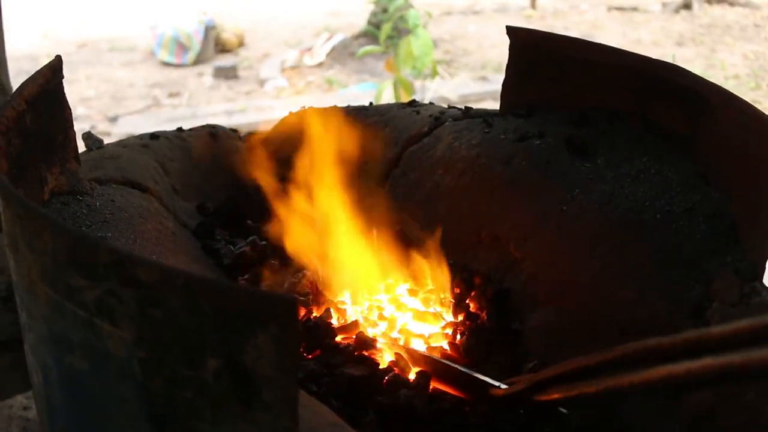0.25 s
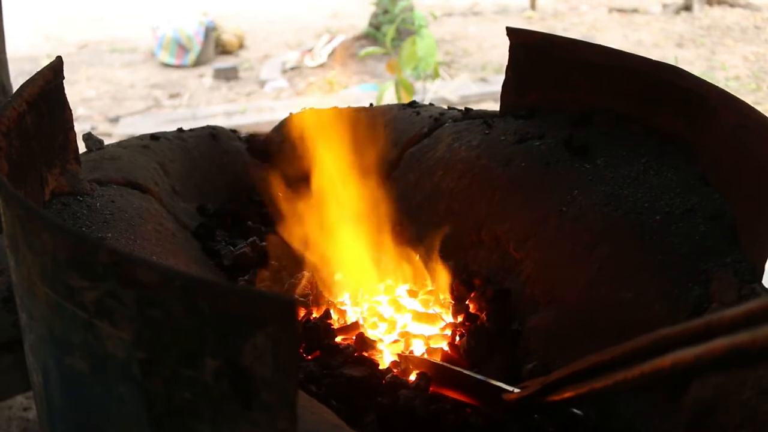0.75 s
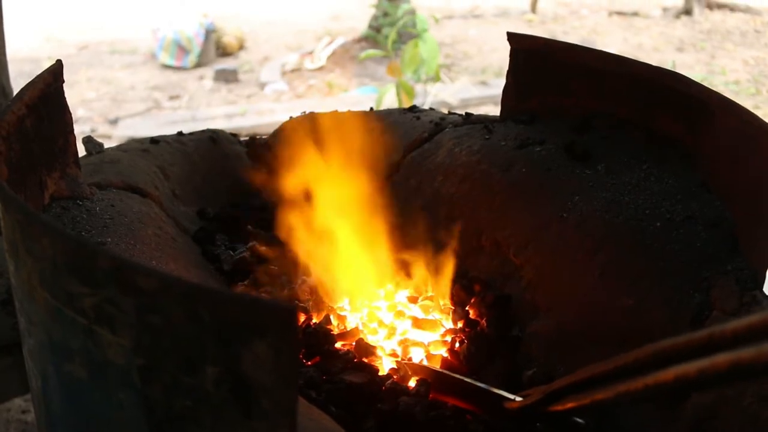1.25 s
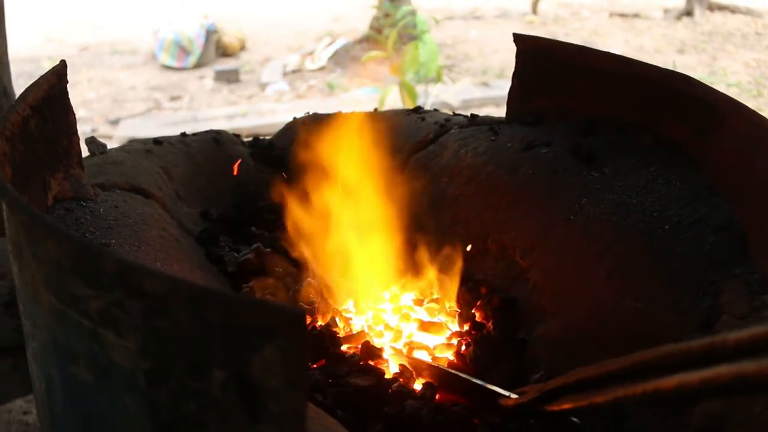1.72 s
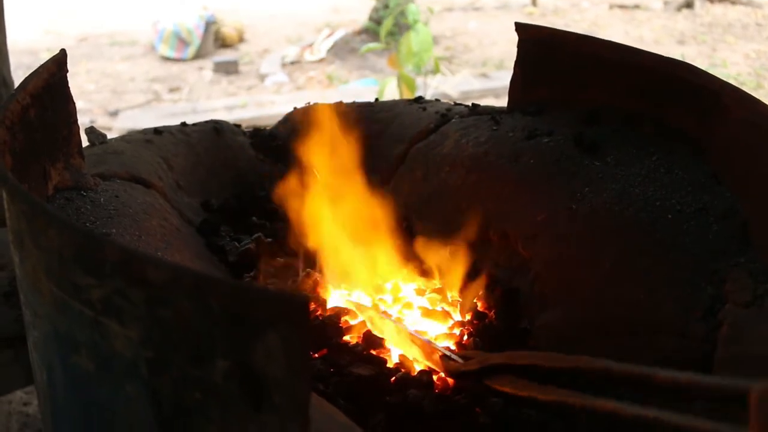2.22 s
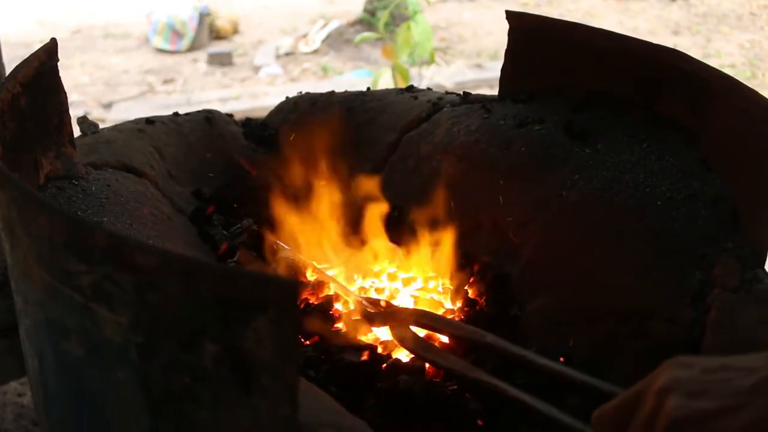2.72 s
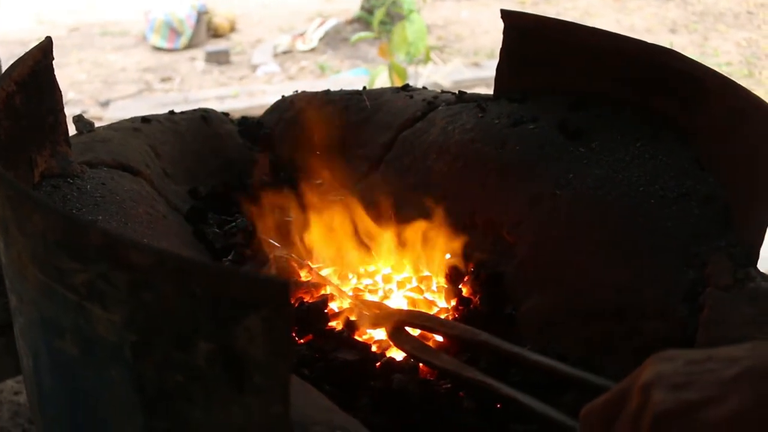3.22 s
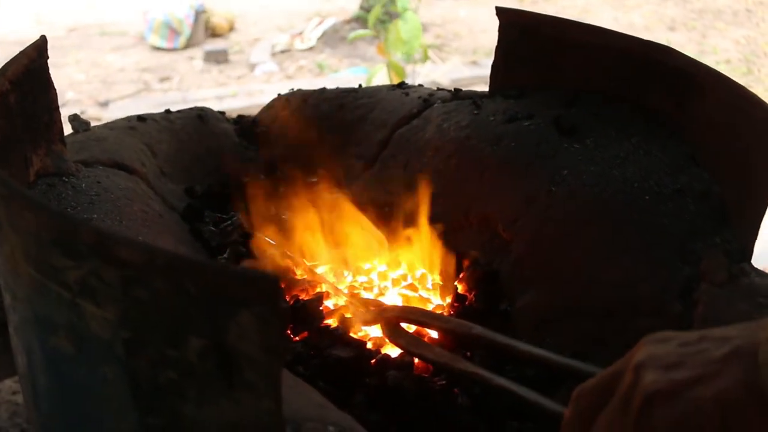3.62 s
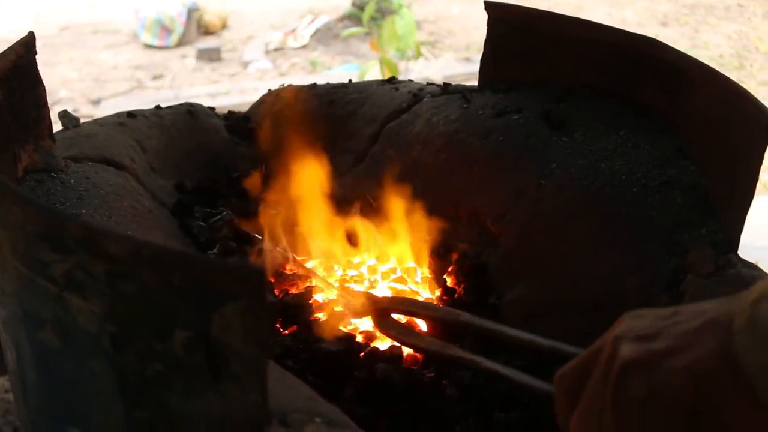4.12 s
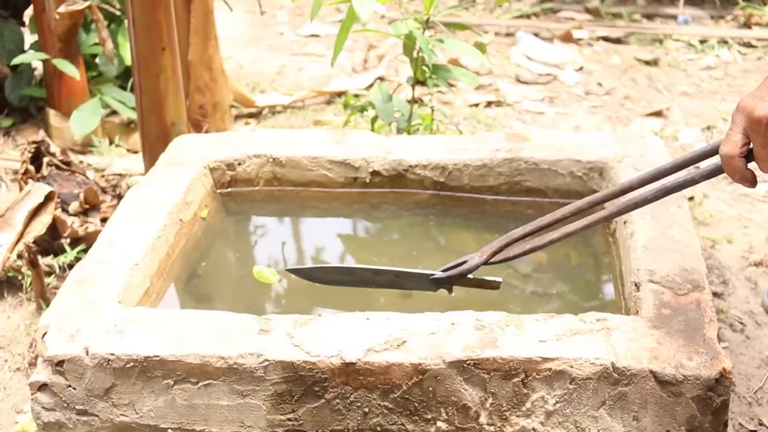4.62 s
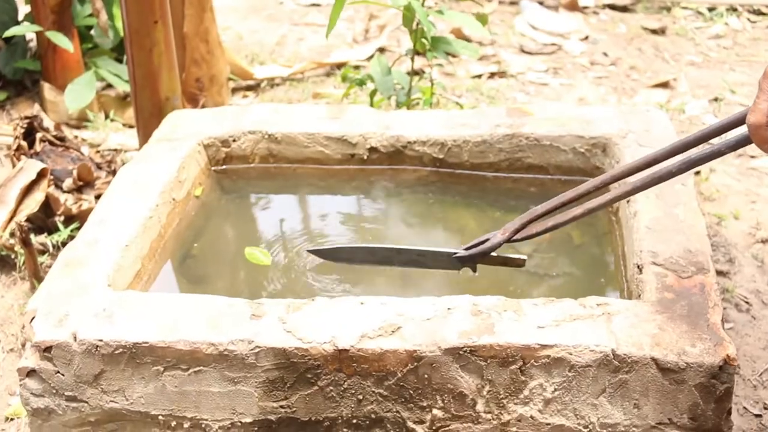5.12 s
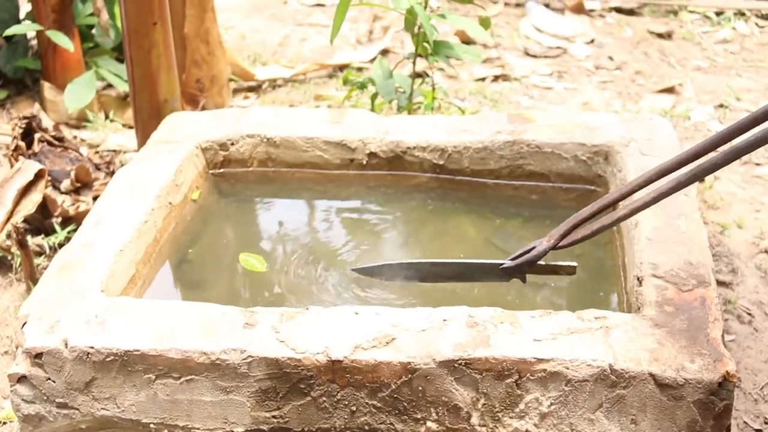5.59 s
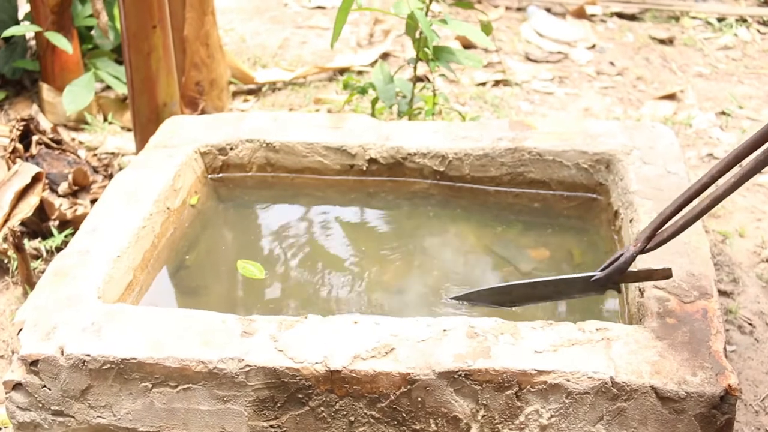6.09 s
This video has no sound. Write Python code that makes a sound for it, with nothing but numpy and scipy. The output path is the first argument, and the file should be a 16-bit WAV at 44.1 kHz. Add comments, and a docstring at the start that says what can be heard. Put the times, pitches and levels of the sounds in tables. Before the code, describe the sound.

A forge fire roars close by in a smithy yard, with the whine and fast metallic rattle of its blower and a few thin snaps of charcoal. After about four seconds the sound switches suddenly to a nearby water tank, where hot steel spits, then sizzles and bubbles for nearly two seconds until it is lifted. Behind it are quiet open air, the fading fan and a faint, distant engine.

```python
"""A smithy yard, close to a charcoal forge: an electric blower drives air roaring through the coals,
its fan whining and its loose bearing rattling in a quick, even beat. The roar ends at once and we are
at a stone water tank, the fan coasting down farther off. A hot blade is dipped: the water spits, then
steam bubbles collapse in a long boiling hiss until it is lifted. A small engine chugs in the distance."""
import sys
import numpy as np
from scipy import signal
from scipy.fft import rfft, irfft, next_fast_len
from scipy.io import wavfile
from scipy.ndimage import uniform_filter1d, map_coordinates

SR = 44100
rng = np.random.default_rng(int(sys.argv[2]) if len(sys.argv) > 2 else 0)


def wav_out(sig):
    """Save sig, one row per channel (or a flat mono array), as 16-bit PCM at SR to the path in sys.argv[1]."""
    wavfile.write(sys.argv[1], SR, np.round(np.clip(np.atleast_2d(sig).T, -1, 1) * 32767).astype(np.int16))


N = 280031

# Spectra of the sources. Each row: frequency in Hz, relative level in dB.
OPEN_AIR = [(20, 4), (60, -4), (95, 1), (130, 9.5), (250, 3.5), (500, 5.5), (900, -1), (1500, -2),
            (4000, -19.5), (15000, -23)]
COAL_ROAR = [(60, -33.5), (130, -11.5), (200, -9), (290, -1), (480, 0.5), (820, -2), (1020, 0),
             (1250, -3.5), (1580, -4.5), (1800, -11.5), (2350, -14.5), (3800, -22.5), (7000, -31.5),
             (15000, -41.5)]
FLAME_RUMBLE = [(10, 3), (25, -5.5), (70, -2), (130, 0.5), (250, -14), (600, -34)]
EMBER_CRACKLE = [(3000, -8), (9000, 1), (12500, -7), (14000, 0), (15700, -6)]
HOUSING_RATTLE = [(900, -26), (2000, -9), (3000, 4.5), (3900, -6), (4500, 4), (5300, 5.5), (6150, 2),
                  (6500, -6), (7200, -16), (8000, -8), (9500, -3), (11200, -4.5), (13000, -15),
                  (15700, -24)]
WATER_BOIL = [(300, -26), (700, -17.5), (1080, -17.5), (1400, -7), (2300, -9.5), (3000, -4), (4700, -5),
              (6000, -4), (8800, -2), (10500, -10.5), (11500, -10.5), (13200, -3), (14500, -5.5),
              (15700, -5)]
STEAM_SPIT = [(1200, -22), (2100, -3), (2600, 12), (3400, 8), (4500, -3), (6000, 6), (9000, 10), (14000, 6),
              (15700, 9)]
BREEZE = [(10, -7), (30, 0), (55, -8), (150, -35), (500, -70)]
FAR_ENGINE = [(60, -22), (115, 1.5), (400, 9), (800, -37), (2000, -30)]
FAR_RUSH = [(100, -8), (300, -1.5), (900, 0), (1500, -7.5), (4000, -14.5), (15000, -25)]
COAL_SNAP = [(2000, -17), (5000, 8), (7000, -3), (10000, 3), (13500, 3), (15700, -3)]
# Resonances and dips. Each row: centre in Hz, width in Hz, gain in dB.
HEARTH_MODES = [(466, 23, 2.5), (677, 50, 2.5), (1850, 70, 1), (2100, 120, 5), (2350, 100, 4),
                (2870, 160, 3), (3370, 150, 2)]  # air pipe and hearth
HOUSING_MODES = [(4470, 38, 7), (4780, 80, -8), (4950, 49, 7), (5530, 51, 2.5), (6060, 47, 2.5),
                 (7000, 140, -9), (7640, 60, 12), (7960, 90, 3), (8360, 49, 9), (8640, 60, -7),
                 (8800, 60, 7), (9370, 50, 7), (10200, 60, 5), (10700, 120, 0.5), (12520, 43, 1),
                 (14400, 150, 7)]  # the blower's thin metal
TANK_MODES = [(1380, 160, -0.5), (1676, 120, -6.5), (2140, 59, 0), (2310, 110, -2.5), (2730, 220, 2),
              (3280, 120, -7), (5440, 140, 5), (5880, 120, 2.5), (6850, 130, 0.5)]  # between the stone walls
# The engine's exhaust pipe. Each row: frequency in Hz, relative level in dB, t60 in seconds.
EXHAUST_MODES = [(140, -8.5, 0.08), (195, -4, 0.062), (336, -2.5, 0.021)]
# The six-bladed fan from close by. Each row: multiple of the shaft speed, rms level in dB.
FAN_TONES = [(3, -46.5), (6, -35), (10, -47.5), (11, -45.5), (12, -33.5), (13, -42.5), (18, -43),
             (21, -52.5), (25, -52)]
# Charcoal splitting. Each row: start in seconds, starting level in dB.
SNAP_EVENTS = [(0.0702, -41), (0.1012, -31), (0.1645, -33), (0.4075, -39), (0.9986, -37), (1.2446, -37),
               (1.6591, -40), (3.0864, -32), (3.4481, -38)]
# Water flashing to steam. Each row: start in seconds, level in dB, t60 in seconds.
SPIT_EVENTS = [(4.596, -24.5, 0.14), (5.191, -22, .015), (5.562, -23, 0.034)]
# Resonances and one dip around the blade. Each row: centre in Hz, strongest moment in seconds,
# swell width in seconds, gain in dB.
BLADE_RESONANCES = [(3580, 5.2, 0.48, 5.5), (6220, 5, .28, 7), (6190, 5.59, 0.34, 9.5),
                    (7010, 5.77, 0.27, 7), (9860, 5.26, .55, -5)]
# Bubbles, from big and gurgling to fine and hissing. Each row: low and high edge in Hz, time of full
# strength in seconds, level in dB, surge in dB, drift in dB per second.
BUBBLE_BANDS = [(200, 2500, 4.81, -44, 2.5, 2.5), (2520, 4500, 4.795, -36.5, 3.5, 0.4),
                (4410, 10060, 4.765, -28, 2.5, -1), (9970, 17600, 4.748, -25, 1, -1.3)]

SHAFT_HZ, BEAT_HZ, BALL_HZ = 74.29, 11.89, 246.66  # the blower: its turn, bearing play, passing balls
STIR_S = 2.33  # tongs push into the coals
FORGE_END_S, TOUCH_S = 4.407, 4.5  # the roar ends; the blade grazes the water


def amp(db):
    """Decibels to gain."""
    return np.exp(np.maximum(db, -300) * np.log(10) / 20)


def unit(x):
    """Scale to rms 1."""
    return x / np.sqrt(np.mean(x ** 2) + 1e-20)


def clock():
    """The time of every sample in seconds."""
    return np.arange(N) / SR


def since(s):
    """Seconds gone by since s, 0 before it."""
    return np.maximum(clock() - s, 0)


def ramp(start_s, length_s):
    """0 before the start, then straight up to 1."""
    return np.clip((clock() - start_s) / length_s, 0, 1)


def swell(centre, width, x):
    """A bell over x, 1 at its centre."""
    return np.exp(-((x - centre) / width) ** 2)


def wobble(rate):
    """A smooth random curve, rate knots a second."""
    return map_coordinates(rng.standard_normal(int(N * rate / SR) + 4), [clock() * rate])


def filtered(x, response):
    """x times a response of frequency."""
    size = next_fast_len(N + 8192)
    return irfft(rfft(x, size) * response(np.fft.rfftfreq(size, 1 / SR)), size)[..., :N]


def edge(hz, edge_hz):
    """Gain of a steep high-pass."""
    return 1 - 1 / (1 + (hz / edge_hz) ** 16)


def coloured(x, spectrum, modes=()):
    """x shaped by a spectrum on a log axis with bell-shaped resonances on it, at rms 1."""
    points_hz, points_db = np.transpose(spectrum)

    def response(hz):
        outline_db = np.interp(np.log(hz + 1), np.log(points_hz + 1), points_db)
        return amp(outline_db + sum(db * swell(centre, width, hz) for centre, width, db in modes))
    return unit(filtered(x, response))


def noise(spectrum, modes=()):
    """Coloured noise of rms 1."""
    return coloured(rng.standard_normal(N), spectrum, modes)


def crackle(rate, spread_db, snap_s, ring_s, ring_share):
    """Random tiny bursts of scattered size: each is a snap of noise and a weaker, longer ring."""
    sizes = amp(spread_db * np.clip(rng.standard_normal(N), -2.6, 2.6))
    energy = sizes ** 2 * (rng.random(N) < rate / SR)
    t = np.arange(SR // 20) / SR
    fade = np.exp(-t / snap_s) / snap_s + ring_share * np.exp(-t / ring_s) / ring_s
    envelope = np.sqrt(np.abs(signal.fftconvolve(energy, fade)[:N]))
    return unit(envelope * rng.standard_normal(N))


def yard(air_db=-46.5, puff_s=5.1, puff_width_s=0.04, puff_db=-48):
    """Quiet open air all round, and one soft puff of breeze on the microphone."""
    puff = swell(puff_s, puff_width_s, clock()) * noise(BREEZE)
    return amp(air_db) * noise(OPEN_AIR) + amp(puff_db) * puff


def engine(level_db=-48, firing_hz=23.83, on_beat_s=5.66):
    """Far off, a steady single-cylinder engine: each firing rings the exhaust at a slightly new strength."""
    cycle = np.floor(firing_hz * (clock() - on_beat_s))
    firings = np.diff(cycle, prepend=cycle[0]) * amp(0.5 * rng.standard_normal(N))
    t = np.arange(SR // 8) / SR
    pipe = sum(amp(db - 60 * t / t60) * np.sin(2 * np.pi * hz * t) for hz, db, t60 in EXHAUST_MODES)
    return amp(level_db) * coloured(signal.fftconvolve(firings, pipe)[:N], FAR_ENGINE)


def fan_whine(shaft_hz, flutter_db, waver_rad):
    """Fan tones on multiples of the shaft speed, each shaken a little by the turbulent air."""
    angle = 2 * np.pi * np.cumsum(shaft_hz) / SR
    tones = np.zeros(N)
    for multiple, db in FAN_TONES:
        strength = amp(db + flutter_db * wobble(10))
        tones += strength * np.sin(multiple * angle + waver_rad * wobble(7))
    return np.sqrt(2) * tones


def coasting_fan(off_s=4.59, coast_s=2.1, far_db=-13.5, dull_hz=900, fade_s=4.79, fade_db_per_s=114):
    """The fan from the tank, dulled by distance: power off, drag slows it, and whine and rush die away."""
    speed = np.exp(-since(off_s) / coast_s)  # share of full speed
    tones = fan_whine(SHAFT_HZ * speed, flutter_db=1.8, waver_rad=0.5)
    dulled = filtered(tones, lambda hz: 1 / np.sqrt(1 + (hz / dull_hz) ** 6))
    rush = amp(-42.5) * speed ** 3.5 * noise(FAR_RUSH)
    return amp(far_db - fade_db_per_s * since(fade_s)) * dulled + rush


def embers(rest_db=-68, stir_db=-51, stir_length_s=0.44, edge_s=0.033):
    """The coals crackle faintly, and crunch while the tongs push through them."""
    stirring = ramp(STIR_S, edge_s) - ramp(STIR_S + stir_length_s, edge_s)
    sparks = crackle(rate=170, spread_db=4.5, snap_s=0.0004, ring_s=0.003, ring_share=0.5)
    return (amp(rest_db) + amp(stir_db) * stirring) * coloured(sparks, EMBER_CRACKLE)


def charcoal_snaps(t60=0.026):
    """Single pieces of charcoal split with a thin snap."""
    envelope = sum(amp(db - 60 * since(s) / t60) * (clock() >= s) for s, db in SNAP_EVENTS)
    return envelope * noise(COAL_SNAP)


def beat(lead_cycles=-0.012):
    """The even beat of the bearing's play, from -1 to 1."""
    return np.cos(2 * np.pi * (BEAT_HZ * clock() + lead_cycles))


def pulse_treble(x, above_hz, depth_db):
    """The top of x rises and falls with the bearing's beat."""
    treble = filtered(x, lambda hz: edge(hz, above_hz))
    return x + treble * (amp(depth_db * beat()) - 1)


def thin_metal(x, depth_db=1.43, spacing_hz=55):
    """Countless weak modes of sheet metal comb x at random."""
    modes_hz = np.arange(0, SR / 2, spacing_hz)
    mode_db = depth_db * rng.standard_normal(len(modes_hz))
    return filtered(x, lambda hz: amp(np.interp(hz, modes_hz, mode_db)))


def bearing(level_db=-40.5, beat_db=2.0, turn_db=2.0, lead_turns=-0.35):
    """A loose bearing rattles the housing once a turn, and harder with each beat of its play."""
    turn = np.cos(2 * np.pi * (SHAFT_HZ * clock() + lead_turns))
    contact = amp(beat_db * beat() + turn_db * turn)
    knocks = contact * crackle(rate=2900, spread_db=5.5, snap_s=0.00069, ring_s=0.0037, ring_share=0.95)
    chatter = coloured(thin_metal(knocks), HOUSING_RATTLE, HOUSING_MODES)
    chatter = pulse_treble(chatter, above_hz=6200, depth_db=1.0)  # harder contact is brighter
    return amp(level_db) * unit(chatter)


def fire_roar(roar_db=-24, choke_db_per_s=0.65, flame_db=-48, flare_s=3.7, flare_width_s=0.49):
    """Air roars through the coals; the tongs damp it, and the disturbed flame rumbles more for a while."""
    air = pulse_treble(noise(COAL_ROAR, HEARTH_MODES), above_hz=1900, depth_db=1.23)
    rumble_db = flame_db + 4 * swell(flare_s, flare_width_s, clock()) + 1.6 * wobble(6.3)
    return amp(roar_db - choke_db_per_s * since(STIR_S)) * air + amp(rumble_db) * noise(FLAME_RUMBLE)


def forge():
    """Close on the fire, with the blower whining and rattling beside it."""
    blower = bearing() + fan_whine(np.full(N, SHAFT_HZ), flutter_db=0.8, waver_rad=0.28)
    return fire_roar() + embers() + charcoal_snaps() + blower


def spits(attack_s=0.00092):
    """Water flashes to steam in short spits, the longest as the blade's edge first dips."""
    envelope = sum(amp(db - 60 * since(s) / t60) * (1 - np.exp(-since(s) / attack_s))
                   for s, db, t60 in SPIT_EVENTS)
    return envelope * noise(STEAM_SPIT)


def blade_colour(x, width_share=0.047, climb_per_s2=0.024):
    """Resonances climb as the blade nears the wall; crossing wall echoes add a fine, drifting ripple."""
    hz, t, spectra = signal.stft(x, SR, nperseg=512)
    climb = 1 + climb_per_s2 * np.maximum(t - TOUCH_S, 0) ** 2
    modes_db = sum(db * swell(s, width_s, t) * swell(centre * climb, centre * width_share, hz[:, None])
                   for centre, s, width_s, db in BLADE_RESONANCES)
    drift = uniform_filter1d(rng.standard_normal(spectra.shape), size=90, axis=1)
    ripple_db = 1.4 * unit(uniform_filter1d(drift, size=2, axis=0))
    return signal.istft(spectra * amp(modes_db + ripple_db), SR, nperseg=512)[1][:N]


def boiling(full_s, level_db, surge_db, drift_db_per_s, plunge_s=0.088, surge_s=5.19, lift_s=6.234):
    """Strength of one size of bubble: touch, plunge, surge, slow drift as the steel cools, lift."""
    shallow_db = -16 * (1 - ramp(full_s - plunge_s, plunge_s))  # a thin hiss until the blade is under
    fierce_db = surge_db * swell(surge_s, 0.18, clock())
    cooling_db = drift_db_per_s * since(full_s)
    lifted_db = -205 * since(lift_s)
    return ramp(TOUCH_S, length_s=0.048) * amp(level_db + shallow_db + fierce_db + cooling_db + lifted_db)


def quench(sputter_db=0.3):
    """Close by, steam bubbles collapse on the steel; the finest peak first, big ones grow as it cools."""
    bubbles = crackle(rate=7000, spread_db=3.3, snap_s=0.00011, ring_s=0.004, ring_share=0.9)
    water = blade_colour(coloured(bubbles, WATER_BOIL, TANK_MODES))
    hiss = np.zeros(N)
    for low_hz, high_hz, *course in BUBBLE_BANDS:
        band = filtered(water, lambda hz: edge(hz, low_hz) - edge(hz, high_hz))
        hiss += boiling(*course) * unit(band)
    return amp(sputter_db * wobble(22)) * hiss


def scene(cut_s=0.00079):
    """The microphone is first at the forge, then at the tank; both channels are alike."""
    at_forge = np.clip((FORGE_END_S - clock()) / cut_s, 0, 1)
    tank = quench() + spits() + coasting_fan() + engine() + yard()
    mono = at_forge * forge() + (1 - at_forge) * tank
    return np.array([mono, mono])


def record(dry, top_hz=15780):
    """The microphone chain passes nothing above its band limit."""
    return filtered(dry, lambda hz: hz < top_hz)


dry = scene()
out = record(dry)
wav_out(out)
```